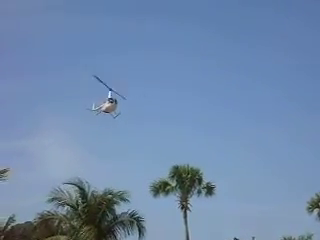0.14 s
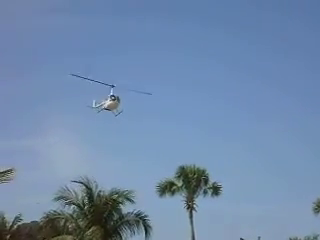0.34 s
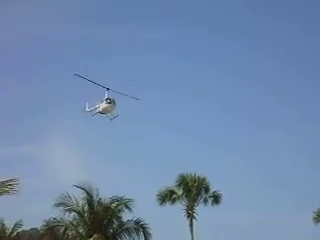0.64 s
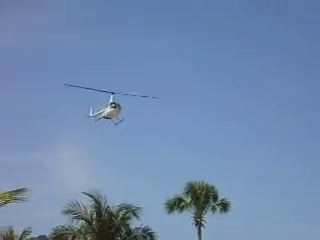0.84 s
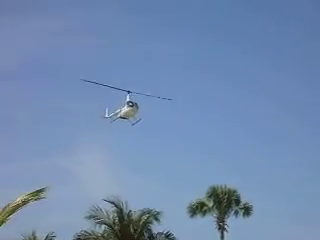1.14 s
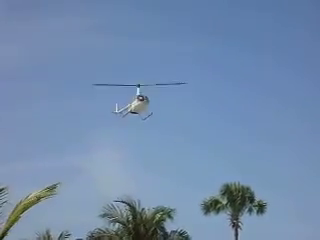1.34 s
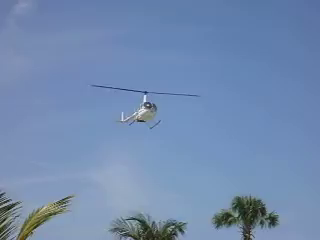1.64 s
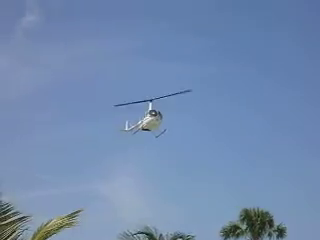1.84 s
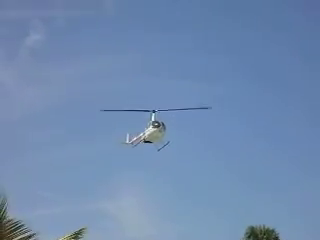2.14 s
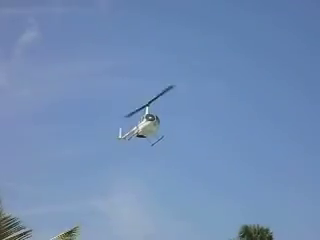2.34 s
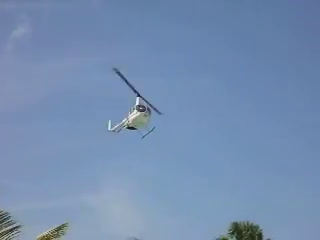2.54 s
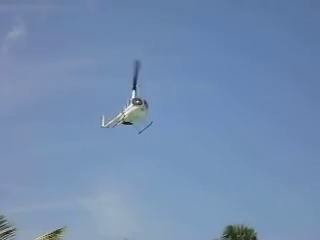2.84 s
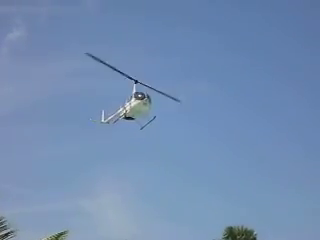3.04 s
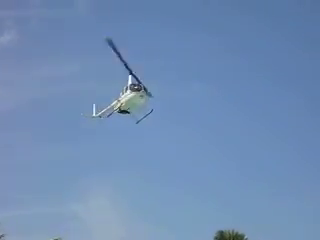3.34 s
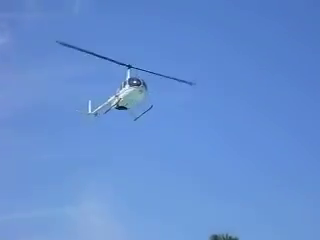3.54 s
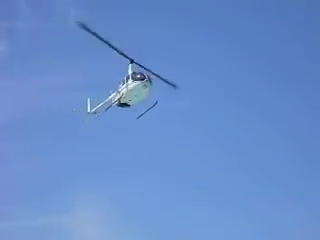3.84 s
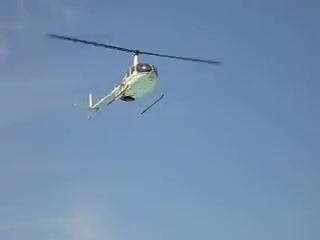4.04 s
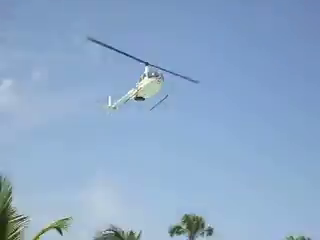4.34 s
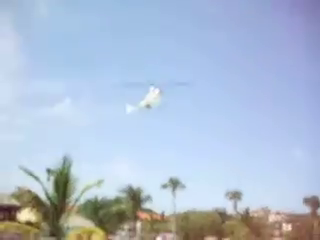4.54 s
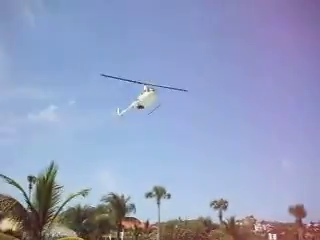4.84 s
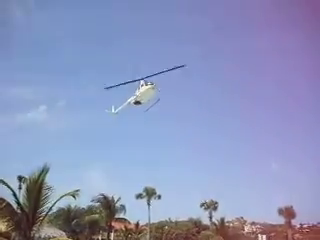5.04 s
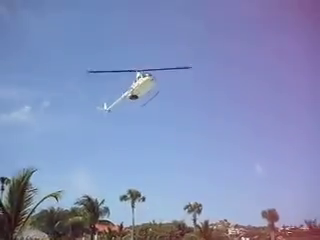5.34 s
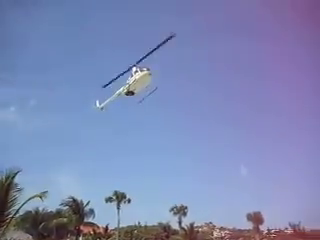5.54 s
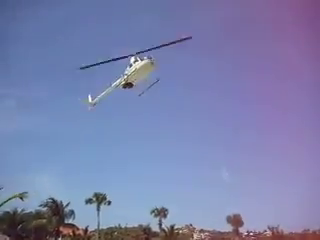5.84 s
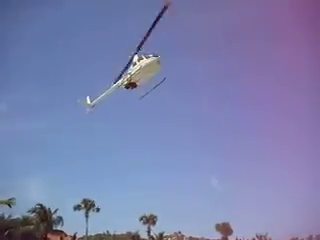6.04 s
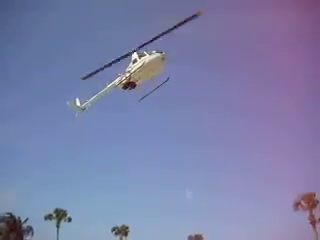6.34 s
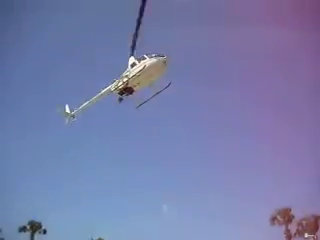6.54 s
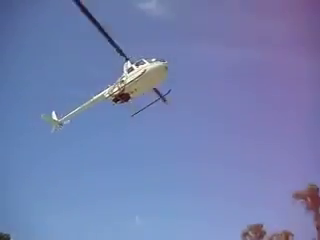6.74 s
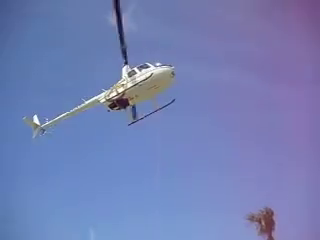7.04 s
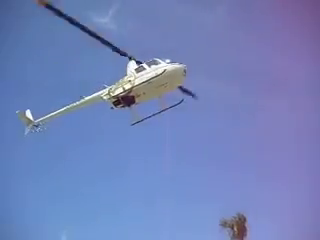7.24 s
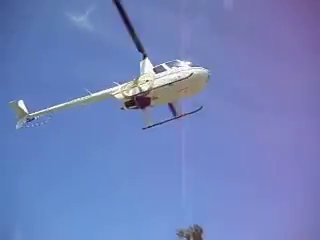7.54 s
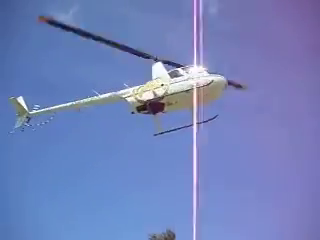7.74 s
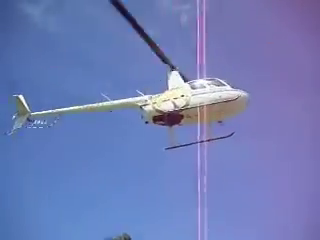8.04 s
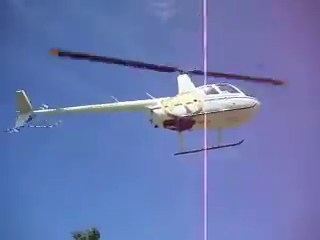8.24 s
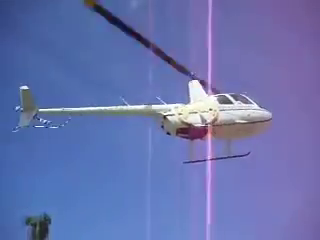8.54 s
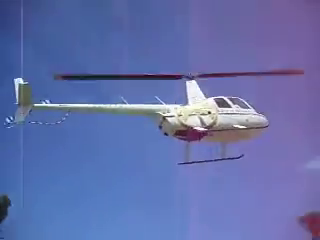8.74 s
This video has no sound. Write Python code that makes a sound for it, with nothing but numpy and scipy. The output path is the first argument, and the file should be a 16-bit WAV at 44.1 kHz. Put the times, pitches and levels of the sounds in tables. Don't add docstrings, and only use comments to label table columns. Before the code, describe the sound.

A small two-blade helicopter slaps steadily closer over airy hiss, drops into brief silence, then returns nearer with ragged chops, exhaust drone and crackling overloads.

```python
import sys
import numpy as np
from scipy import signal
from scipy.fft import rfft, irfft, next_fast_len
from scipy.io import wavfile
from scipy.ndimage import uniform_filter1d, map_coordinates

SR = 44100
rng = np.random.default_rng(int(sys.argv[2]) if len(sys.argv) > 2 else 0)


def transcribe(signal):
    frames = np.atleast_2d(signal).T
    limited = np.clip(frames, -1, 1)
    pcm = np.round(limited * 32767).astype(np.int16)
    wavfile.write(sys.argv[1], SR, pcm)


def ratio_of_db(decibels):
    return 10 ** (np.asarray(decibels, float) / 20)


N = 392049
T = np.arange(N) / SR

# start_s, end_s
VIEWS = [
    (0, 4.2255),
    (4.8895, 8.89),
]
# frequency_hz, density_db
ROAR = [(90, -69.5), (160, -9.5), (300, -1), (430, -6), (680, -5), (1000, -10), (1500, -12), (2500, -71.5)]
TAIL_PER_BLADE = 5.99


def unit(x):
    return x / np.sqrt(np.mean(x ** 2) + 1e-20)


def curves(rows):
    s, *cols = np.transpose(rows)
    return [np.interp(T, s, c) for c in cols]


def wobble(rate):
    return map_coordinates(rng.standard_normal(int(N * rate / SR) + 4), [T * rate])


def filtered(x, response):
    m = next_fast_len(N + 8192)
    return irfft(rfft(x, m) * response(np.fft.rfftfreq(m, 1 / SR)), m)[:N]


def bumps(table):
    return lambda hz: ratio_of_db(sum(db / (1 + (2 * (hz - c) / w) ** 2) for c, w, db in table))


def rush(points, patchy_db):
    z = signal.stft(rng.standard_normal(N + 512), nperseg=512)[2]
    field = uniform_filter1d(rng.standard_normal(z.shape), size=4, axis=0)
    field = uniform_filter1d(field, size=8, axis=1)
    x = signal.istft(z * ratio_of_db(patchy_db * unit(field)), nperseg=512)[1][:N]
    f, db = np.transpose(points)
    return unit(filtered(x, lambda hz: ratio_of_db(np.interp(np.log(hz + 1), np.log(f), db, -120, -120))))


def orders(turns, table, flutter_db):
    return sum(ratio_of_db(db + flutter_db * wobble(5.5)) * np.cos(2 * np.pi * k * turns) for k, db in table)


def blade_turns():
    # first_passage_s, passages_per_s, drift_per_s2
    rotor_speed = [
        (.0485, 14.223, .0065),
        (4.8985, 14.176, -.069),
    ]
    first, rate, drift = np.transpose(rotor_speed)[:, (T > VIEWS[0][1]) * 1]
    return (T - first) * (rate + drift * (T - first) / 2)


def wash(turns, near_db):
    # frequency_hz, density_db
    rumble_colour = [(12, -36), (25, -9.5), (60, -11.5), (100, -1.5), (140, -4), (200, -7), (320, -18.5),
                     (500, -93.5)]
    # frequency_hz, density_db
    hiss_colour = [(700, -52.5), (1300, -0.5), (1600, 2), (2200, -1), (2900, -6), (4500, -9), (6500, -18),
                   (9000, -33)]
    # time_s, length_s, level_over_rumble_db
    gusts = [(2.93, 0.08, 9), (3.947, 0.16, 10), (5.903, 0.17, 3), (7.0, .13, 10), (7.998, 0.13, 4),
             (8.295, 0.13, 5), (7.6, 0.22, -4)]
    swish = (5 - 0.37 * near_db) * np.cos(2 * np.pi * (turns - .08))  # dB, shallower close by
    chop = 2.0 * np.cos(2 * np.pi * TAIL_PER_BLADE * turns)
    drift = wobble(6)
    puffs_db = sum(db * np.exp(-((T - s) / long) ** 2) for s, long, db in gusts)

    rumble_db = -44 + 1.62 * near_db + puffs_db + 1.6 * swish + 1.8 * wobble(3.2)
    roar_db = -29 + near_db + 0.42 * swish + 0.46 * chop + 0.73 * drift
    hiss_db = -38 + 1.053 * near_db + 0.32 * swish + chop + 0.75 * drift
    rumble = ratio_of_db(rumble_db) * rush(rumble_colour, 2.0)
    roar = ratio_of_db(roar_db) * rush(ROAR, 0.72)
    hiss = ratio_of_db(hiss_db) * rush(hiss_colour, 0.95)
    return rumble + roar + hiss


def rotor_thump(turns, near_db):
    # order, level_db
    rotor_orders = [(1, -3), (2, 2.5), (3, -8.5), (4, -5), (5, -3), (6, -6.5), (7, -7.5), (8, -14), (9, -9)]
    return ratio_of_db(-48.5 + 0.12 * near_db) * orders(turns - .07, rotor_orders, flutter_db=0)


def tail_rotor(turns, near_db):
    # order, level_db
    tail_orders = [(1, -6.5), (2, -1.5), (3, 0), (4, 2), (5, 0.5), (6, -10.5), (7, -14.5), (8, -9.5),
                   (10, -9.5)]
    return ratio_of_db(-39.5 + .45 * near_db) * orders(TAIL_PER_BLADE * turns, tail_orders, flutter_db=0)


def engine():
    # time_s, firing_hz, first_order_db, second_order_db
    firing = [(0, 142.3, -54.5, -53), (4.2, 142.3, -51.5, -49), (4.9, 142, -47, -49),
              (5.3, 141.2, -36, -46), (5.8, 140.6, -33.5, -47), (6.25, 140.4, -32, -41.5),
              (7.1, 138.9, -27, -27), (7.5, 138.2, -26.5, -25.5), (8.05, 138.1, -23, -25.5),
              (8.6, 138, -25.5, -22), (8.89, 137, -25, -26)]
    # order, level_re_second_db
    exhaust = [(3, -14), (4, -18), (5, -10), (6, -20), (6.5, -13.5), (.5, -19), (1.5, -21)]
    # frequency_hz, density_db
    whine = [(2550, -39.5), (2750, -5), (2860, 3.5), (2950, -7.5), (3150, -39)]
    hz, first_db, second_db = curves(firing)
    turns = np.cumsum(hz * (1 + .001 * wobble(8))) / SR
    first = np.sqrt(2) * ratio_of_db(first_db) * orders(turns, [(1, 0)], flutter_db=0)
    upper = orders(turns + .1, [(2, 0.0027), *exhaust], flutter_db=2.0)
    gear_whine = ratio_of_db(second_db - 18) * rush(whine, 1.5)
    return first + np.sqrt(2) * ratio_of_db(second_db) * upper + gear_whine


def slap_rows(turns, near_db):
    # start_s, slap_db, vortex_train_hz, length_ms
    far_spells = [(0, -19.5, 472, 7), (.09, -18, 648, 8.6), (.37, -13.5, 713, 7.3), (.44, -16, 706, 6.4),
                  (.51, -12.5, 703, 6.8), (.72, -10.5, 754, 6.1), (.79, -18.5, 565, 10.2),
                  (.93, -13, 763, 6.2), (1.0, -8, 650, 5.04), (1.21, -13, 650, 5), (1.35, -6, 667, 5.55),
                  (1.56, -13.5, 468, 7.3), (1.63, -13, 667, 7.7), (1.85, -9, 664, 6.05),
                  (2.06, -16, 638, 8.2), (2.19, -22, 416, 12), (2.27, -13, 544, 4.4),
                  (2.34, -10, 639, 4.05), (2.55, -16, 649, 8.7), (2.69, -10.5, 554, 7),
                  (2.9, -10, 556, 4.9), (2.97, -6.5, 650, 5.4), (3.04, -8.5, 612, 7.5),
                  (3.32, -2, 594, 5.5), (3.39, -2.5, 525, 4.6), (3.46, -7.5, 557, 6.2),
                  (3.6, -8.5, 566, 7.2), (3.81, -6, 650, 5.5), (4.02, -5, 570, 6.3), (4.16, -4.5, 623, 5.6)]
    # start_s, slap_db, vortex_train_hz, length_ms
    near_spells = [(4.86, -16.5, 574, 12), (5.0, -14, 487, 12.1), (5.22, -6.5, 382.4, 10),
                   (5.5, -20.5, 443, 16), (5.78, -6, 445, 6.3), (5.85, -8, 600, 6.8), (5.92, -9, 396.5, 18),
                   (6.07, -3.5, 564, 6.56), (6.14, -9.5, 337, 16), (6.21, -15, 545.5, 16.6),
                   (6.42, -16.5, 457, 18.6), (6.71, -6, 620, 7.6), (6.78, -3, 380, 7.3),
                   (6.85, -10.5, 409, 19.8), (6.99, -5.5, 537, 12.7), (7.13, -8, 357.6, 16.8),
                   (7.42, -14, 424, 16.5), (7.57, -8.5, 537, 6.8), (7.71, -5, 317, 8),
                   (7.78, -7.5, 458, 21), (7.92, -9.5, 355, 31), (8.14, -3.5, 336, 13),
                   (8.21, -7, 316, 13.7), (8.35, -2, 264, 12.6), (8.5, -8, 294, 19), (8.64, -7, 601, 23.4),
                   (8.71, 0, 520, 7.1), (8.78, -5, 295, 13), (8.85, -16, 355, 19)]
    # time_s, change_db
    accents = [(.05, -2.5), (.4, -4), (.54, -9), (1.17, 9), (1.66, -1), (1.87, 0.5), (1.94, -9), (2.01, -2),
               (2.93, 2.5), (3.21, -7), (3.35, 2.5), (4.05, 2), (4.19, -10), (5.39, -1), (5.68, 4),
               (5.88, -17), (6.1, -15), (6.6, 2), (6.88, 1), (7.03, 7), (7.67, -7), (7.81, 2.5), (7.16, 1),
               (8.09, -26)]
    at = np.flatnonzero((np.diff(np.floor(turns)) == 1) & (turns[1:] >= 0))
    at = at[sum((T[at] > start) & (T[at] < end) for start, end in VIEWS) > 0]
    spells = np.array([*far_spells, *near_spells])
    spell = np.clip(np.searchsorted(spells[:, 0], T[at]) - 1, 0, None)
    db, hz, ms = spells[spell, 1:].T

    luck = rng.standard_normal((len(at), 4)).T
    db = db + 1.06 * luck[0]
    hz = hz * (1 + .04 * luck[1])
    ms = ms * (1 + .1 * luck[2])
    crack_db = -22 + 0.23 * db + 0.28 * near_db[at] - 0.4 * luck[3]
    crack_db = crack_db + sum(extra_db * (np.abs(T[at] - s) < .03) for s, extra_db in accents)
    return np.transpose([T[at] - ms / 2000, db, hz, ms, crack_db - db])


def slaps(rows):
    # frequency_hz, density_db
    crack_colour = [(500, -50), (1200, -15.5), (1600, 2), (2200, -4.5), (3200, -13), (5000, -17.5),
                    (7000, -28), (9000, -45)]
    # centre_hz, width_hz, peak_db
    blade_colour = [(834, 160, 3), (914, 80, -7.5), (1127, 260, 1.5)]
    lead_ms, lag_ms = 2.22, 5.5
    train, fronts, crack, burst, echo = np.zeros((5, N + SR))
    t = np.arange(2600) / SR
    luck = rng.standard_normal((len(rows), 24))
    for (s, db, hz, ms, crack_db), knots in zip(rows, luck):
        life = max(ms - 2.2, 2.3) / 1000
        abeam = s > VIEWS[1][0]
        smear = np.clip((ms - 5.2) / 7 + 0.22 * abeam, .05, 1.1)
        jitter = np.interp(t * hz * 1.1, np.arange(24), knots - knots[0])
        cycles = hz * t - .5 + 0.27 * smear * jitter

        wave = -np.sin(2 * np.pi * cycles)
        wave -= 0.29 * np.sin(2 * np.pi * 1.76 * cycles + .5)
        wave -= 0.032 * np.sin(6 * np.pi * cycles + 0.54)
        thud = .35 * np.interp(s, [1.7, 3.4], [0, 1]) * (not abeam)
        wave -= thud * np.sin(np.pi * cycles)

        lumps = ratio_of_db((5.5 + 1.0 * smear) * np.interp(t * hz * 1.3, np.arange(24), knots[::-1]))
        rise = 0.4686 * smear * life + 0.44 / hz
        decay = np.exp(-(np.maximum(t - 0.68 * rise, 0) / (0.98 * life)) ** 3)
        swell = (1 - np.exp(-(t / rise) ** 3)) * decay
        first = round((s + 0.00035 - abeam * lead_ms / 1000 - 0.528 * rise) * SR)
        at = slice(first, first + len(t))
        late = slice(first + round(abeam * lag_ms * SR / 1000), None)

        train[at] += ratio_of_db(db - 1.5 - 1.8 * smear) * wave * swell * lumps
        front_luck = knots[np.clip(cycles + 1, 0, 23).astype(int)]
        shock = np.exp(-(cycles % 1) / 0.048) * ratio_of_db(3.74 * front_luck - 5.3 * cycles)
        fronts[late][:len(t)] -= ratio_of_db(db + crack_db + 21.0 - 3.5 * abeam) * shock * swell
        burst[at] += ratio_of_db(db - 7.0) * smear ** 0.71 * swell
        crack[late][:len(t)] += ratio_of_db(db + crack_db - 4.0) * swell * (.5 + 1.0 * smear)
        echo[at] += ratio_of_db(db) * (1 - np.exp(-t / life)) ** 2 * np.exp(-t / 0.0062)

    scatter = ratio_of_db(-13) * rush(ROAR, 1.5) + ratio_of_db(-11.5) * rush(crack_colour, 3.6)
    train = filtered(train[:N], lambda hz: 1 / np.sqrt(1 + (170 / (hz + 1)) ** 4))
    fronts = filtered(fronts[:N], lambda hz: 1 / np.sqrt(1 + (900 / (hz + 1)) ** 4)
                      / np.sqrt(1 + (hz / 4200) ** 6))
    noisy = burst[:N] * rush(ROAR, 2.2) + crack[:N] * rush(crack_colour, 0.97)
    return filtered(train + fronts, bumps(blade_colour)) + noisy + echo[:N] * scatter


def off_ground(x):
    # time_s, delay_ms, strength_0_to_1
    ground = [(0, 3.2, .62), (2, 3.55, .62), (4.2, 4.45, .65), (4.9, 4.6, .5), (6.8, 6.9, .4),
              (8.89, 7.8, .3)]
    ms, strength = curves(ground)
    dull = filtered(x, lambda hz: 1 / (1 + (hz / 850) ** 2))
    return (x + strength * np.interp(T - ms / 1000, T, dull)) / np.sqrt(1 + strength ** 2)


def overloaded(x):
    # time_s, length_ms, spill_db
    overloads = [(3.278, .15, -26), (3.9806, .28, -27), (4.1918, .15, -25), (5.8845, .11, -25),
                 (6.8799, .56, -24), (7.0256, .51, -24.5), (7.0952, .28, -29.5), (7.1653, .17, -24.5),
                 (7.6014, .42, -24), (7.6694, .28, -31), (7.6736, .28, -30), (7.7456, .3, -24),
                 (8.0284, .28, -24), (8.1771, .3, -25), (8.2412, .84, -63), (8.321, .28, -25.5),
                 (8.3832, .26, -25), (8.3925, .7, -33), (8.459, .3, -38), (8.5282, .28, -27),
                 (8.5432, .45, -27), (8.6901, .15, -33), (8.7612, .28, -22), (8.8332, .6, -31)]
    # time_s, length_ms, spill_db
    wide_dropouts = [(8.1048, .24, -35), (8.2444, .54, -30)]
    floor, crest, toggle_ms, recovery_ms = 0.79, 0.8, .14, 6
    dropouts = [(*row, True) for row in overloads] + [(*row, False) for row in wide_dropouts]

    after = np.zeros(N)
    for s, *_ in dropouts:
        after[round(s * SR):][:900] += np.exp(-(T[:900] * 1000 / recovery_ms - 1.4) ** 4)
    treble = filtered(x, lambda hz: 1 / (1 + (1300 / (hz + 1)) ** 4))
    x = x - np.clip(0.52 * after, 0, .8) * treble

    spill = np.zeros(N)
    since = (np.arange(400) - 160) / SR * 1000
    for s, span, spill_db, toggles in dropouts:
        at = slice(round(s * SR) - 160, round(s * SR) + 240)
        beat = span / max(round(span / toggle_ms), 1) if toggles else span
        hold = np.clip(np.minimum(since + 0.32, span + 0.27 - since) / 0.32, 0, 1)
        shoulders = np.exp(-(since + 0.53) ** 2 / 0.25) + np.exp(-(since - span - .9) ** 2 / 0.62)
        toggled = -floor * np.cos(np.pi * np.clip(since, 0, span) / beat) ** 2
        trough = hold * (toggled - x[at])
        x[at] = np.clip(x[at] + trough - shoulders * trough.sum() / shoulders.sum(), -floor, crest)
        spill[round((s + span / 2000) * SR)] = ratio_of_db(spill_db + 8)
    band = filtered(x, lambda hz: 1 / np.sqrt(1 + (hz / 7800) ** 60))
    above = filtered(spill, lambda hz: 1 / (1 + (8000 / (hz + 1)) ** 30) / (1 + (hz / 16100) ** 60))
    return band + above


def booms():
    # time_s, pitch_hz, level_db
    folds = [
        (7.03, 235, -18),
        (8.099, 210, -12.5),
        (8.46, 203, -12),
        (8.6, 218, -11),
    ]
    return sum(ratio_of_db(db) * np.exp(-((T - s) / 0.015) ** 2) * np.sin(2 * np.pi * hz * (T - s))
               for s, hz, db in folds)


def scene():
    # time_s, nearness_re_mid_descent_db
    nearness = [(0, -12.5), (.5, -11), (1.3, -8), (1.8, -9), (2.7, -6), (3.4, -3.5), (4.2, -2.5),
                (4.9, -1.1), (5.8, 1.9), (6.2, 3), (6.6, 3.5), (7.2, 6), (7.5, 7.5), (8, 9), (8.89, 11.5)]
    turns = blade_turns()
    near_db, = curves(nearness)
    overhead = wash(turns, near_db) + tail_rotor(turns, near_db) + slaps(slap_rows(turns, near_db))
    return (off_ground(overhead) + rotor_thump(turns, near_db) + engine() + booms())[None]


def top_cut(x):
    return signal.sosfilt(signal.butter(12, 16810, fs=SR, output="sos"), x)


def record(dry):
    # centre_hz, width_hz, peak_db
    housing = [(702, 130, 3.5), (1078, 150, 1.5), (1529, 360, -7.5)]
    x = filtered(dry[0], bumps(housing))
    x = x / (1 + np.abs(x / .72) ** 6) ** (1 / 6)
    running = sum((T >= start) & (T < end) for start, end in VIEWS)
    x = filtered(x * running, lambda hz: 1 / np.sqrt(1 + (hz / 7400) ** 24))
    gate = uniform_filter1d(running * 1., size=89) > 0
    return top_cut((overloaded(x) * gate)[None])


dry = scene()
out = record(dry)
transcribe(out)
```